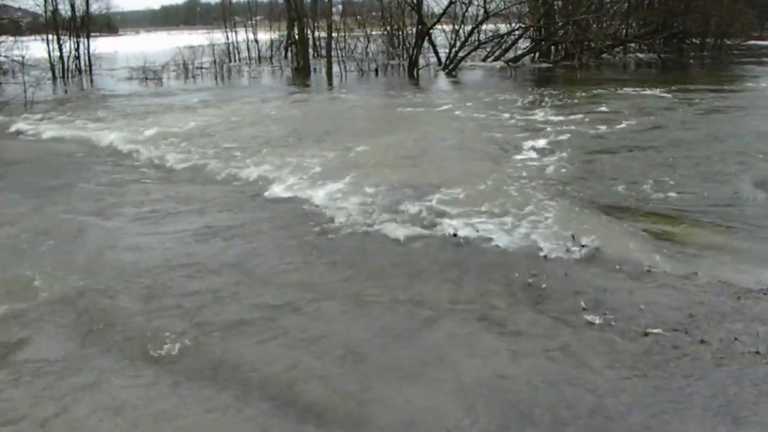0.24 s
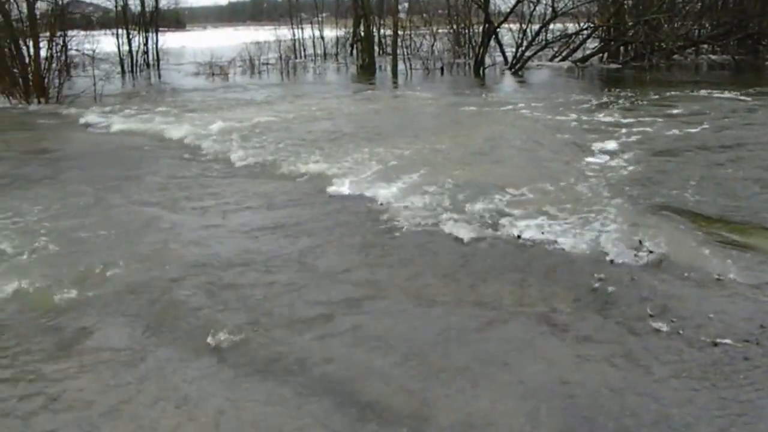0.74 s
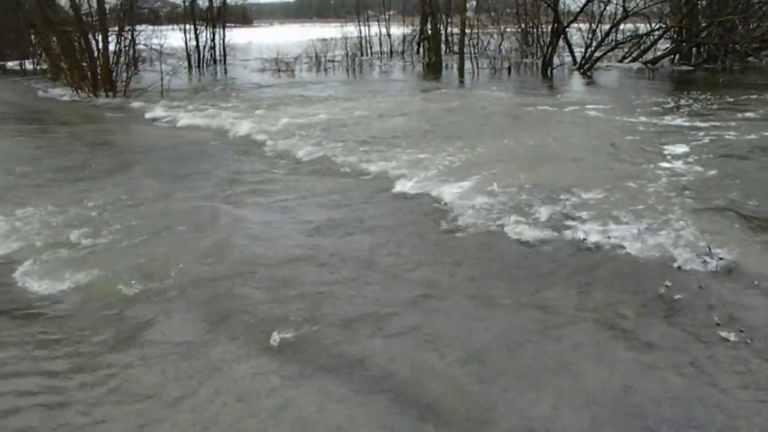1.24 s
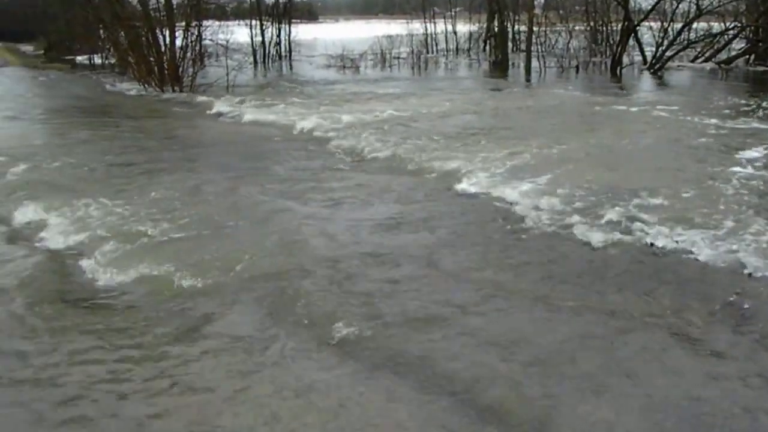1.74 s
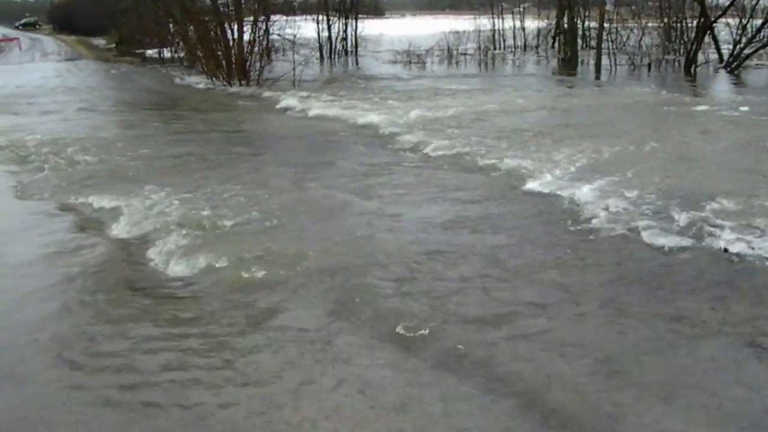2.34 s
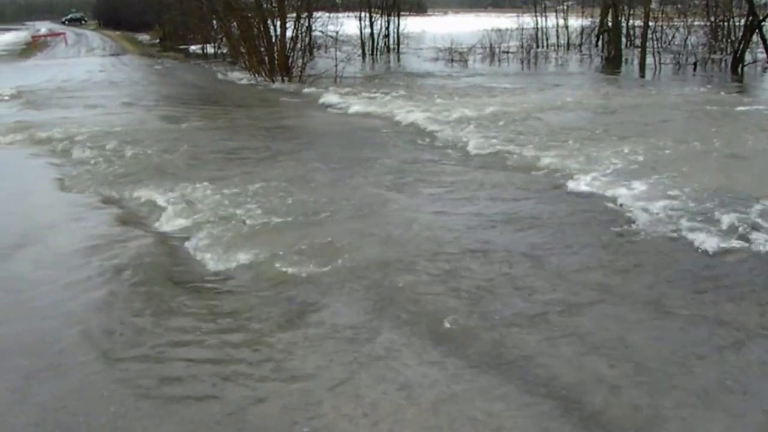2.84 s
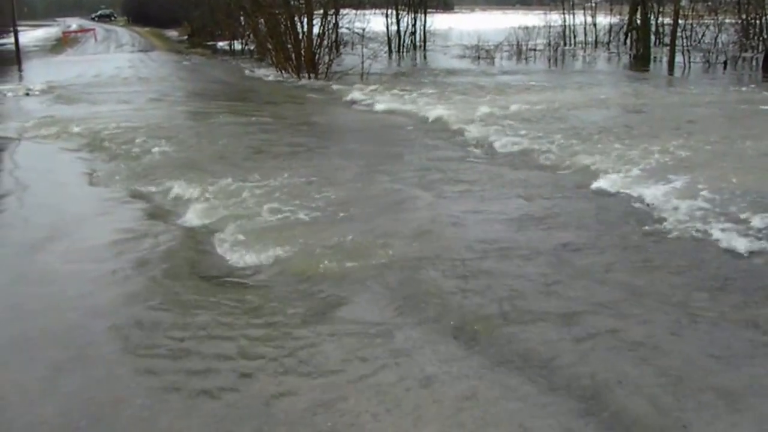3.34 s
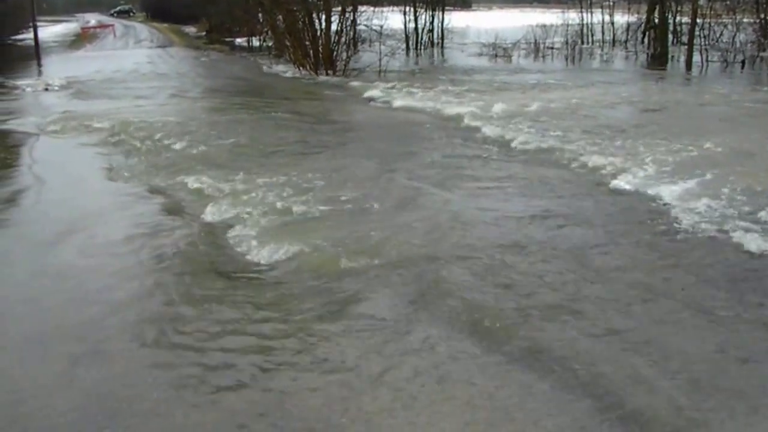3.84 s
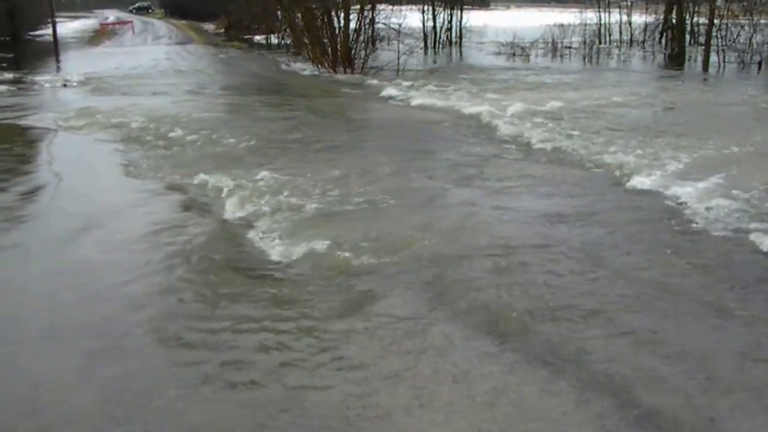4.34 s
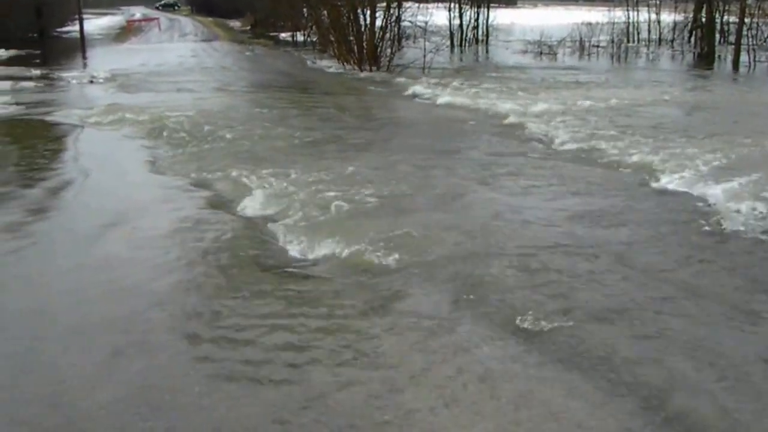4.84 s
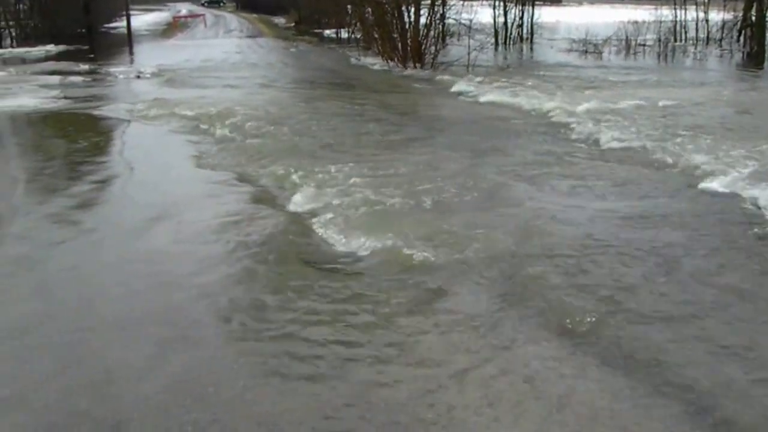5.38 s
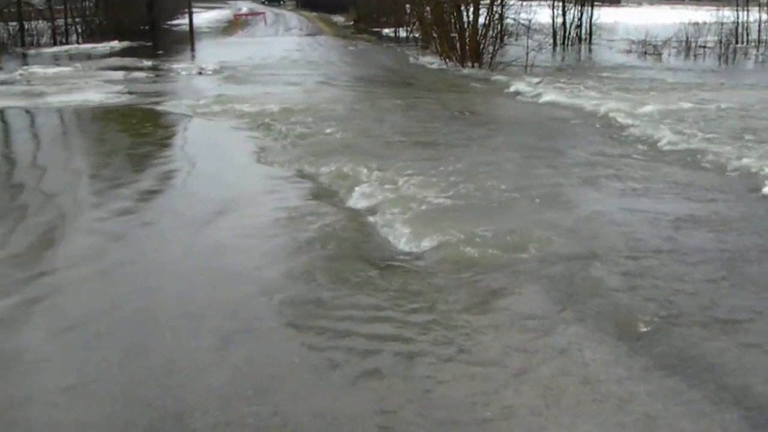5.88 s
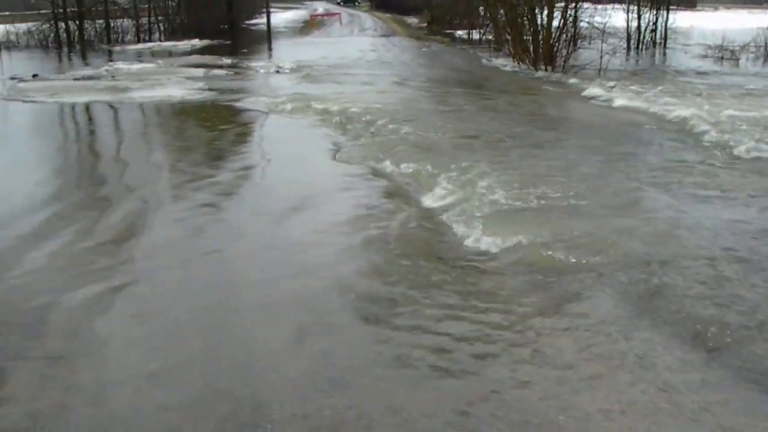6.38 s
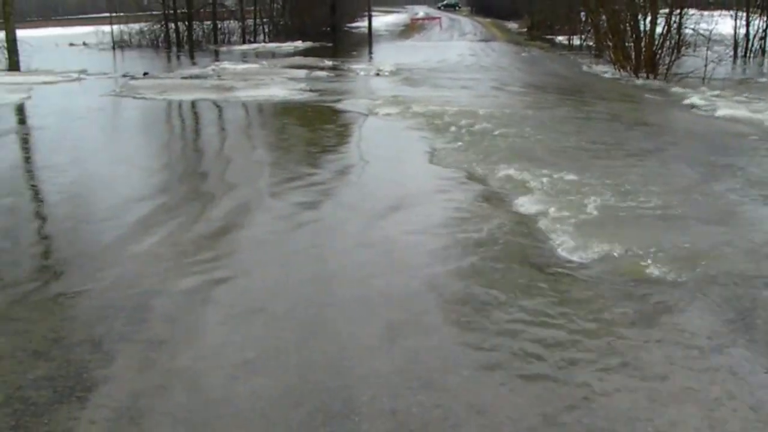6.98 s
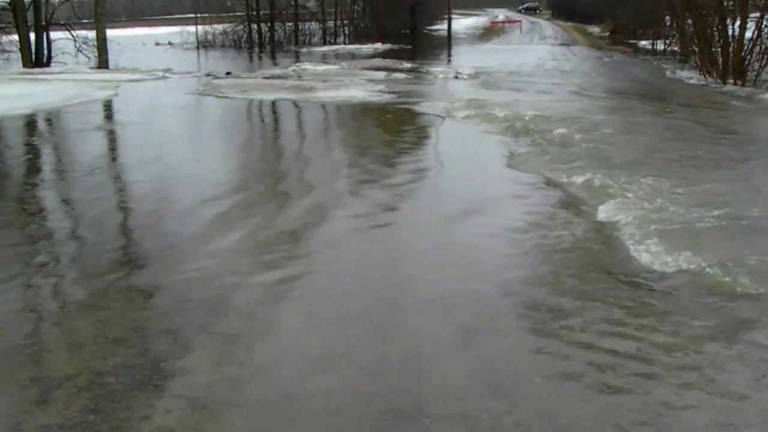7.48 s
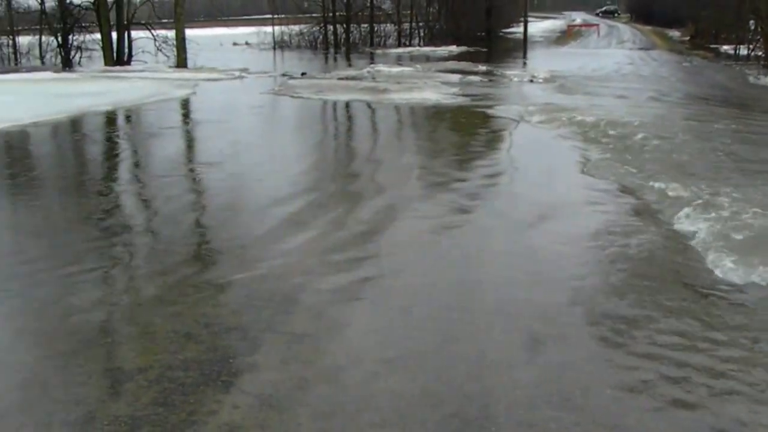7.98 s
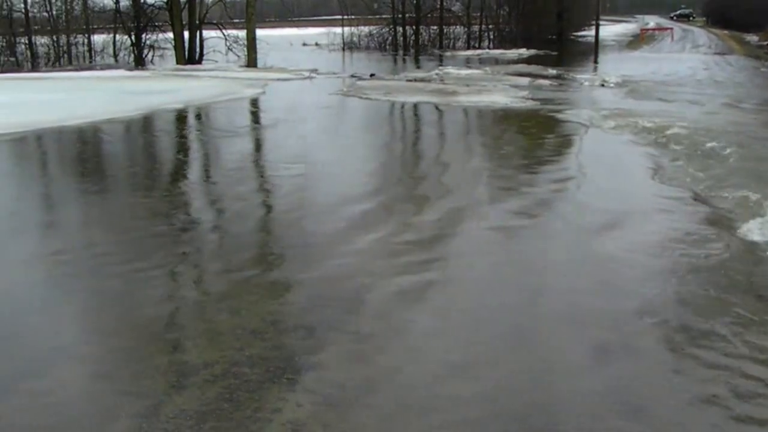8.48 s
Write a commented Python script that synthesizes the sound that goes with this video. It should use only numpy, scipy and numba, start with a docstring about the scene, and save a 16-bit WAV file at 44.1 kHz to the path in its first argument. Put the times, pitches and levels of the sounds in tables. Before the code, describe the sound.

Outdoors at the edge of a flooded road, water churns and hisses without pause, nearly constant in strength. Fine foam sizzle rides over a midrange churn full of small bubbles. Brief, muffled low wind rumbles come early and peak around three seconds, then fade. Scattered sharp droplet ticks and tiny rising bubble notes appear nearby. Toward the end the mono sound grows duller as the microphone turns from the foam.

```python
"""A broad rush of water is heard first: a flood pours over a woodland road into a long line of foam.
Filtered noise stands for the countless far bubbles; damped sines make ringing bubbles and fizzing foam.
A light breeze rumbles on the microphone as shaped low noise, with one gust and brief buffets.
Single droplets tick and single bubbles ring close by, each a damped sine at its own moment.
The hand-held mono microphone slowly turns away from the foam at the water's edge, so the hiss dulls."""
import sys
import numpy as np
from scipy import signal
from scipy.fft import rfft, irfft, next_fast_len
from scipy.io import wavfile
from numba import njit

SR = 44100
rng = np.random.default_rng(int(sys.argv[2]) if len(sys.argv) > 2 else 0)


def put_to_file(sound):
    """Save the sound as 16-bit audio at rate SR, in the file named by the first command-line argument."""
    columns = np.atleast_2d(sound).T  # one column per channel
    safe = np.clip(columns, -1, 1)
    whole_steps = np.round(safe * 32767)
    wavfile.write(sys.argv[1], SR, whole_steps.astype(np.int16))


N = 384552

# filter that colours the breaking water: (frequency [Hz], gain [dB])
WATER_COLOUR = [(190, -34), (260, -13), (390, -8.5), (520, -3.5), (820, 0.5), (1100, -0.5), (1500, 1.55),
                (1950, -1.5), (2700, -3.5), (3500, -3), (4900, -6), (6700, -3), (9500, -20), (15500, -32.5)]
# strength of the breaking wave: (time [s], churn level [dB])
WAVE_SURGE = [(.45, -24), (1.3, -22.5), (5.6, -23), (8.72, -24)]
# how far the microphone has turned from the foam: (time [s], angle [degrees])
MICROPHONE_TURN = [(0, 3), (1.2, 8), (3, 25), (5.1, 27), (6, 35), (8, 64), (8.72, 68)]
# filter that colours the wind's rumble on the microphone: (frequency [Hz], gain [dB])
RUMBLE_COLOUR = [(20, -16), (45, -5.5), (80, 1.5), (135, -2.5), (180, -3), (260, -47)]
# single strong eddies striking the microphone: (time [s], rumble level [dB])
WIND_BUFFETS = [(1.565, -49), (1.70, -44), (1.82, -48), (1.995, -43), (2.28, -51), (2.405, -48),
                (2.95, -42), (3.09, -40), (3.22, -44), (4.06, -54), (6.27, -53), (7.51, -56), (8.56, -54)]
# droplets bursting close by: (time [s], starting level [dB], starting pitch [Hz])
NEAR_DROPLETS = [(.1287, -2, 8800), (.8115, -13, 7500), (.8860, -8, 9500), (.9787, -11, 7500),
                 (1.2450, -14, 9500), (1.4367, -15, 9500), (2.0748, -10, 10500), (3.3329, -11, 8500),
                 (4.4523, -2, 10000), (4.4738, -5, 10500), (4.5512, -6, 9600), (4.9398, -8, 10000),
                 (5.2250, -9, 11000), (5.4885, -17, 9500)]
# single bubbles, low and high, ringing close by: (time [s], starting level [dB], starting pitch [Hz])
NEAR_BUBBLES = [(2.131, -23, 375), (3.8062, -5, 5170), (4.906, -15, 836), (5.9552, -3, 6200),
                (6.7422, -10, 3750), (7.753, -11, 2100), (8.657, -15, 810), (8.684, -12.5, 740)]

# bands of the water: churn lies lowest, then hiss, sizzle and the finest fizz
CHURN_EDGE_HZ, HISS_EDGE_HZ, SIZZLE_EDGE_HZ = 2200, 5200, 7800
# level of each treble band relative to the churn at angle zero, and what it loses as the microphone turns
HISS_DB, HISS_LOSS_DB_PER_DEG = 0, 0.0753
SIZZLE_DB, SIZZLE_LOSS_DB_PER_DEG = 0.64, 0.125
FINE_DB, FINE_LOSS_DB_PER_DEG = -2.5, 0.1738
# one gust builds and dies away over a faint draught
CALM_DB, GUST_DB, GUST_PEAK_S = -61.5, -45.5, 3.06
GUST_RISE_DB_PER_S, GUST_FALL_DB_PER_S = 9, 23
BUFFET_S = 0.025  # time from a buffet's peak until its power is down to 1/e
NOTCH_HZ, NOTCH_WIDTH_HZ, TOP_HZ = 7900, 1170, 15650


def undb(db):
    """The decibel is logarithmic: 20 dB is a tenfold amplitude gain."""
    return 10 ** (np.asarray(db) / 20)


def level(x, db):
    """Root-mean-square scaling: bring a signal to a given rms level."""
    return x * undb(db) / np.sqrt(np.mean(x ** 2))


def curves(table):
    """Linear interpolation: the columns of a time table, one value a sample."""
    s, *columns = np.transpose(table)
    return [np.interp(np.arange(N) / SR, s, column) for column in columns]


def walk(rate):
    """Random modulation: chance levels, rate of them a second, joined by straight lines, rms 1."""
    knots = rng.standard_normal(int(N / SR * rate) + 2)
    return level(np.interp(np.arange(N) / SR * rate, np.arange(len(knots)), knots), 0)


def shape(x, gain):
    """Linear filtering: multiply the spectrum by a gain that is a function of frequency."""
    size = next_fast_len(N + SR // 10)  # padding keeps the end from wrapping onto the start
    hz = np.maximum(np.arange(size // 2 + 1) * SR / size, 1)
    return irfft(rfft(x, size) * gain(hz), size)[:N]


def colour(x, points):
    """Spectral colouring: filter by points joined on a log-frequency axis."""
    at_hz, db = np.transpose(points)
    return shape(x, lambda hz: undb(np.interp(np.log(hz), np.log(at_hz), db)))


def below(x, edge_hz, order=8):
    """Low-pass filtering: the part of a sound under an edge frequency, without phase shift."""
    return shape(x, lambda hz: 1 / (1 + (hz / edge_hz) ** order))


@njit
def ring(start, hz, cycles, size, glide):
    """Damped oscillation: each sine falls 60 dB in so many cycles; glide raises its pitch near the surface."""
    out = np.zeros(N)
    for k in range(len(start)):
        length = cycles[k] * SR / hz[k]
        first = int(start[k] * SR)
        fade = np.exp(-np.log(1000) / length)
        phase, amplitude = 0., size[k]
        for i in range(max(0, min(int(length), N - first))):
            phase += 2 * np.pi * hz[k] / SR * (1 + glide * i / length)
            out[first + i] += amplitude * np.sin(phase)
            amplitude *= fade
    return out


def rush(flicker_db=0.5, count=16):
    """Incoherent summation: far bubbles merge into noise, each size range surging on its own."""
    rest, out = rng.standard_normal(N), 0
    for edge_hz in np.geomspace(350, 14000, count):
        band = below(rest, edge_hz)
        rest = rest - band
        out = out + band * undb(flicker_db * walk(55))
    return level(out + rest, 0)


def bubbles(low_hz=330, high_hz=5500, cycles=30, spread_db=2.0, glide=0.2, count=40000):
    """Bubble resonance: air folded under the wave rings at many sizes, a few much louder than the rest."""
    when, bore, life, strength = rng.random((count, 4)).T
    hz = low_hz * (high_hz / low_hz) ** bore
    # small bubbles die sooner, so they need more height for the same share of the sound
    size = hz ** 0.79 * undb(-spread_db * np.log(np.maximum(strength, 0.004)))
    return level(ring(when * N / SR, hz, cycles * (0.5 + life), size, glide), 0)


def fizz(low_hz=4200, high_hz=16000, cycles=8, spread_db=2.85, cluster_db=1.1, count=44000):
    """Impulsive excitation: foam films snap for a few cycles, the highest strongest, and swell in clusters."""
    when, bore, life, strength = rng.random((count, 4)).T
    hz = low_hz + (high_hz - low_hz) * bore
    size = hz ** 1.4 * undb(-spread_db * np.log(np.maximum(strength, 0.003)))
    snaps = ring(when * N / SR, hz, cycles * (0.5 + life), size, 0.)
    return level(snaps * undb(cluster_db * walk(60)), 0)


def off_axis(x, angle, dip_hz=11400, width_hz=800, depth=0.48):
    """Diffraction: sound bends round the turning microphone's body and partly cancels in one treble band."""
    dip_band = shape(x, lambda hz: np.exp(-((hz - dip_hz) / width_hz) ** 2))
    return x - depth * angle / angle.max() * dip_band


def torrent(bubble_db=-5.5, fizz_db=-2.0, slosh_db=0.18):
    """Directivity: breaking water loses its treble, the finest fizz most, as the foam leaves the axis."""
    surge_db, = curves(WAVE_SURGE)
    angle, = curves(MICROPHONE_TURN)
    mixture = rush() + undb(bubble_db) * bubbles() + undb(fizz_db) * fizz()
    water = colour(mixture, WATER_COLOUR)
    churn = below(water, CHURN_EDGE_HZ)
    hiss = below(water - churn, HISS_EDGE_HZ, order=40)
    sizzle = below(water - churn - hiss, SIZZLE_EDGE_HZ, order=40)
    fine = off_axis(water - churn - hiss - sizzle, angle)
    treble = level(hiss, HISS_DB) * undb(-HISS_LOSS_DB_PER_DEG * angle)
    treble = treble + level(sizzle, SIZZLE_DB) * undb(-SIZZLE_LOSS_DB_PER_DEG * angle)
    treble = treble + level(fine, FINE_DB) * undb(-FINE_LOSS_DB_PER_DEG * angle)
    # small collapses of the crest throw up spray and sway all the treble at once
    spray = undb(slosh_db * walk(45)) * treble
    return undb(surge_db) * (level(churn, 0) + spray)


def breeze(flutter_db=3.0, edge_hz=160):
    """Turbulent pressure: moving air rumbles on the microphone as a draught, one gust and brief buffets."""
    t = np.arange(N) / SR
    rise_db = GUST_RISE_DB_PER_S * (GUST_PEAK_S - t)
    fall_db = GUST_FALL_DB_PER_S * (t - GUST_PEAK_S)
    gust_db = GUST_DB - np.maximum(rise_db, fall_db)
    power = undb(gust_db + flutter_db * walk(18)) ** 2
    for s, db in WIND_BUFFETS:
        power = power + undb(db) ** 2 * np.exp(-((t - s) / BUFFET_S) ** 2)
    draught, eddies = (colour(noise, RUMBLE_COLOUR) for noise in rng.standard_normal((2, N)))
    draught = level(draught * undb(flutter_db * walk(18)), CALM_DB)
    return draught + level(below(eddies, edge_hz), 0) * np.sqrt(power)


def pops(table, cycles, glide):
    """Superposition: separate damped sines add, each at its own moment."""
    s, db, hz = np.transpose(table).astype(float).copy()
    return ring(s, hz, np.full(len(s), float(cycles)), undb(db), float(glide))


def droplets():
    """Rapid damping: a high ring of few cycles is heard as a tick."""
    return pops(NEAR_DROPLETS, cycles=13, glide=0.05)


def near_bubbles():
    """Light damping: more cycles let a single bubble ring with a rising pitch."""
    return pops(NEAR_BUBBLES, cycles=31, glide=0.11)


def scene():
    """Superposition: water, breeze and near sources reach one microphone, alike in both channels."""
    near = droplets() + near_bubbles()
    near = near - below(near, 220)  # the close sounds are heard with little bass below about 220 Hz
    mono = torrent() + near + breeze()
    return np.array([mono, mono])


def record(dry):
    """Band limitation: the recorder has a narrow notch in the treble and cuts the top."""
    b, a = signal.iirnotch(NOTCH_HZ, NOTCH_HZ / NOTCH_WIDTH_HZ, fs=SR)
    notched = signal.lfilter(b, a, dry)
    # elliptic low-pass: 0.1 dB ripple below the edge, 90 dB rejection above
    top_cut = signal.ellip(12, 0.1, 90, TOP_HZ, fs=SR, output="sos")
    return signal.sosfilt(top_cut, notched)


dry = scene()
out = record(dry)
put_to_file(out)
```